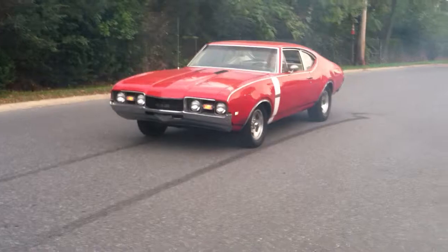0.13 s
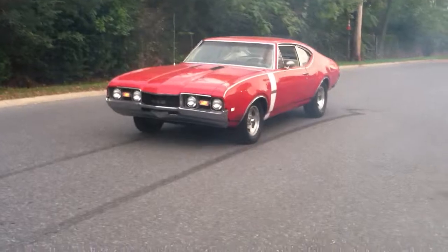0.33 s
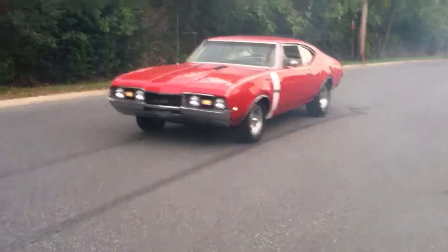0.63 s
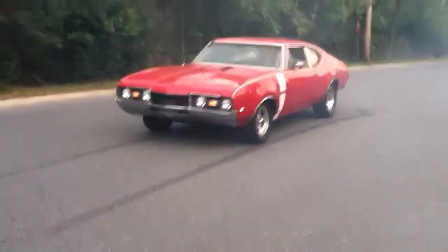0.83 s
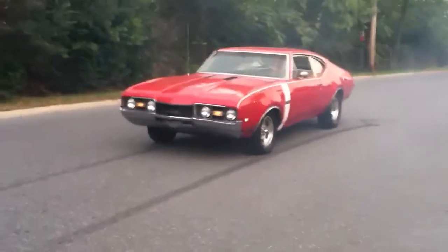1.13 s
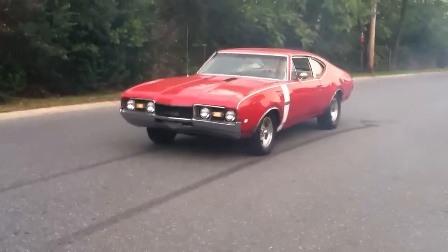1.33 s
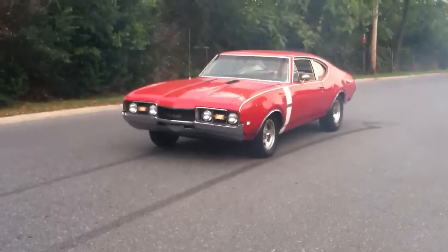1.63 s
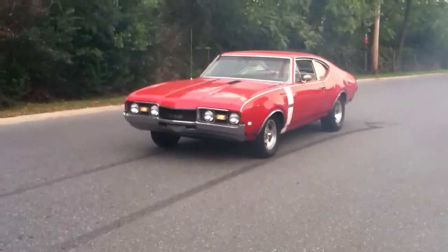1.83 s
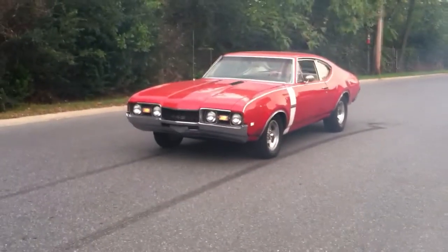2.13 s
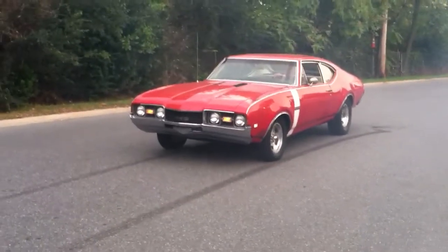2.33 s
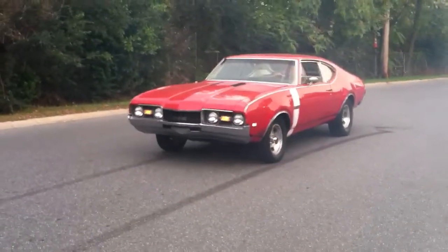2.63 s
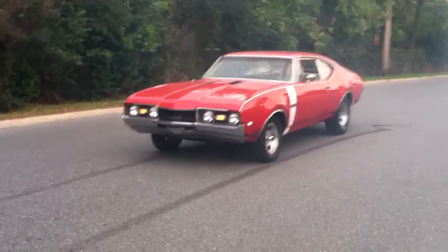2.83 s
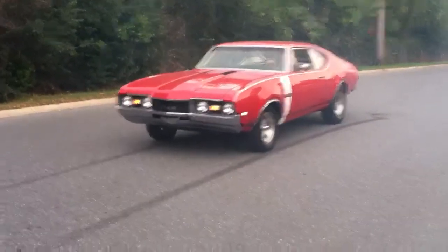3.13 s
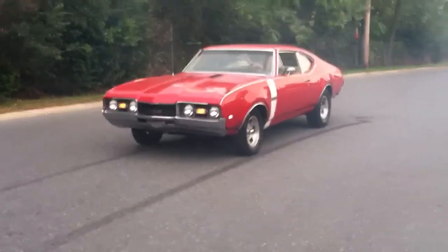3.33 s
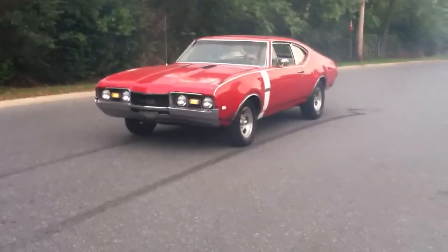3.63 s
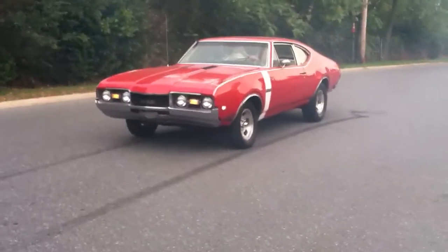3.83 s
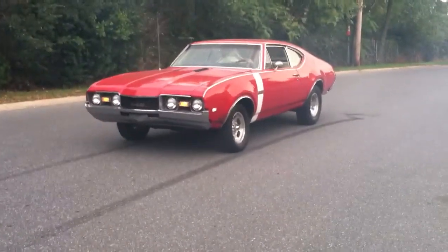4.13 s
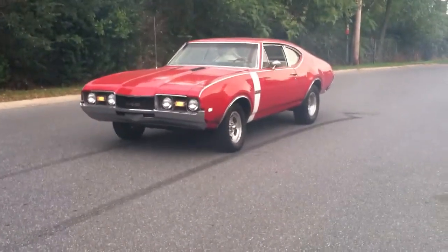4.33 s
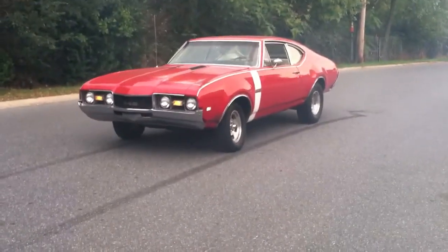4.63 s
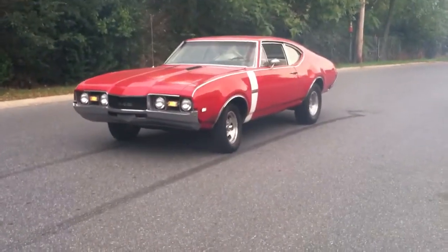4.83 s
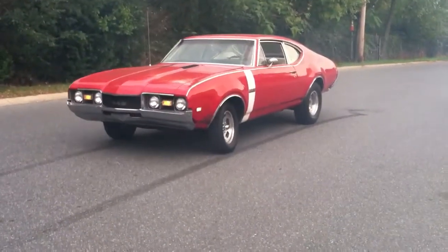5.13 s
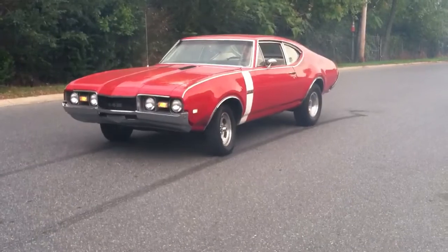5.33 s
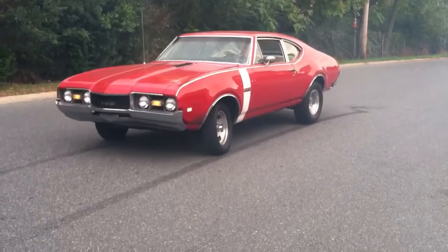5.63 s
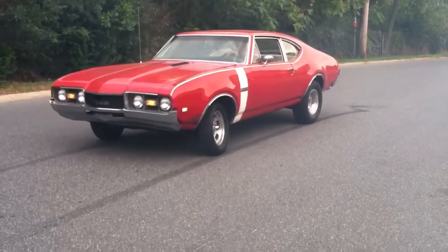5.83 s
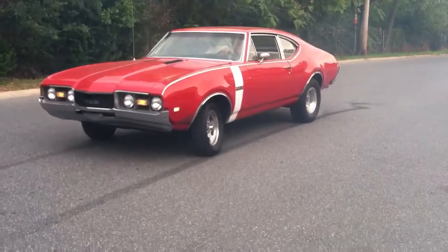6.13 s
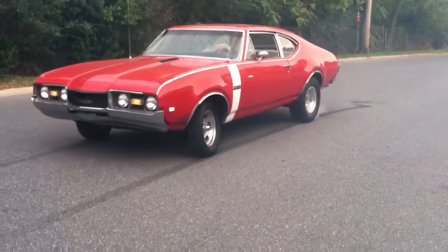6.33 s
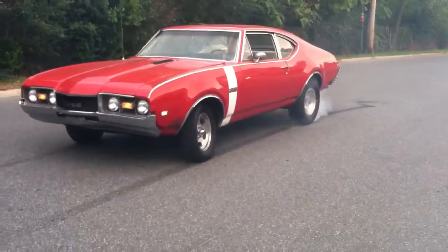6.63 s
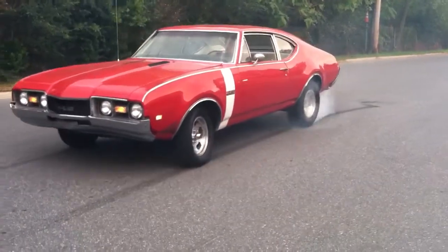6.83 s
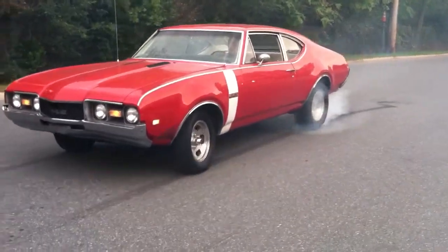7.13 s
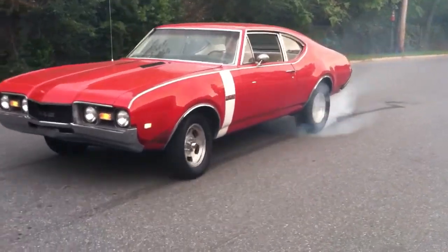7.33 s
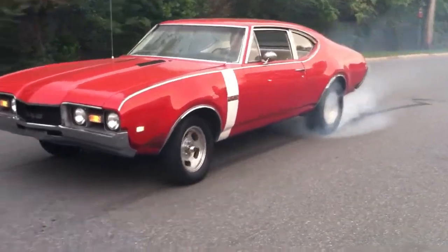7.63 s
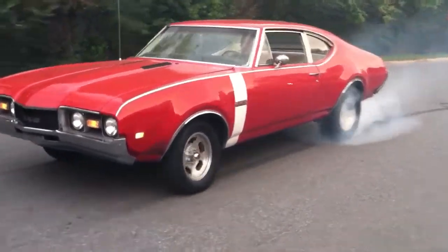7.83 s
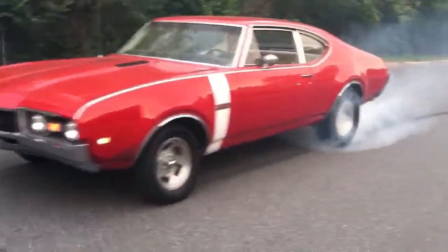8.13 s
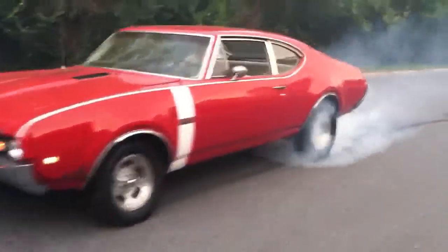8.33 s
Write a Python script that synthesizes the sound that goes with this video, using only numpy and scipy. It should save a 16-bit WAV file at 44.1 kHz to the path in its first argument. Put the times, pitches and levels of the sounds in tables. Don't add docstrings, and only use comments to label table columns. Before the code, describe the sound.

Outdoors, a phone a few metres from an old V8 car picks up uneven idling, breathy air puffs and a faint body knock. The engine loads up to a steady growl while a slipping belt chirps. Then rubber lets go with a burst of gritty hiss and a piercing, slightly wavering screech, lightly echoed by trees, over a raspy roar that rises and holds until the cut.

```python
import sys
import numpy as np
from scipy import signal
from scipy.io import wavfile
from scipy.ndimage import uniform_filter1d

SR = 44100
rng = np.random.default_rng(int(sys.argv[2]) if len(sys.argv) > 2 else 0)


def decibels_to_gain(level_db):
    exponent = np.asarray(level_db, float) / 20
    return 10 ** exponent


def persist_wave(psi):
    counts = np.round(np.clip(psi, -1, 1) * 32767).astype(np.int16)
    wavfile.write(sys.argv[1], SR, np.atleast_2d(counts).T)


N = 373527

# time_s, throttle_0to1, tyre_slip_0to1, intake_whistle_0to1
DRIVE = [(0, 0, 0.16, 0.3), (.25, 0, 0.36, 0.74), (.75, 0.01, 0.36, 0.57), (.9, 0, .3, 0.33),
         (1.8, 0.04, 0.21, 0.26), (2.2, 0.28, 0.36, 0.44), (2.7, 0.7, 0.42, .55), (3.05, 0.72, 0.42, 0.38),
         (3.25, 0.73, 0.57, 0.58), (3.7, 0.74, 0.82, 0.77), (3.87, 0.98, 0.86, 0.95), (3.96, 1, 0.8, 0.34),
         (4.36, 0.86, 0.71, 0.34), (6, 0.92, 0.69, 0.3), (8.2, 0.89, 0.76, 0.51), (8.34, 0.95, 0.8, 0.57),
         (8.47, 0.98, 0.7, .7)]
# time_s, cycles_per_s
SPEED = [(0, 5.95), (2.03, 5.95), (2.55, 11.5), (2.75, 13.7), (2.94, 14.5), (3.7, 14.4), (3.77, 15.1),
         (4.01, 20.3), (4.25, 24.3), (4.55, 26.6), (5.58, 29.8), (5.87, 33.0), (6.22, 41.1), (6.41, 44.4),
         (6.73, 45.4), (8.13, 46.7), (8.27, 40.3), (8.47, 41.1)]
ORDER_SPEEDS = [16, 22, 28.5, 33, 44]
# multiple, level_db at each speed
ORDERS_DB = [(2, 0, -4, 0, 0, -20), (3, -5, -5, -4, -9, -6), (4, 6, 3, -6, -21, -7.5),
             (5, 5, -3.5, 1, -2.5, -3), (6, 1, -8, -16.5, 2.5, 2.5), (7, -6, -4, -11.5, -1, -16),
             (8, 6, -8, -9.5, -0.5, -0.5), (9, 5, -6.5, 1.5, 3, -3.5), (10, -22, -14, -6, -10, -29),
             (11, 2.5, 2, -3, 3.5, -10.5), (12, -9, -6, -17, -9, 2), (13, -6, -7.5, -0.5, -11, -12),
             (14, -20, -11, -3.5, -18, -4.5), (15, -1, -7, -9, -3, -7.5), (16, -4, -1, -8.5, 2, 2),
             (17, -1.5, -4.5, 2, -5, -2.5)]
RASP_DB = [-1.5, 6, 4.5, 10, 10.5]
RASP_HZ = (245, 330, 766, 990)
MUFFLE_DB = [-7, -4, 4, -2, 1.5]
CYLINDERS_DB = [3, -2.5, 0, 7.5, -2.5, -1, 1, 2]
# pitch_hz, level_db
PIPE = [(70, -39.5), (115, -12), (165, -2.5), (205, -4.5), (250, 2.5), (310, -13.5), (400, -15.5),
        (480, -14.5), (620, -15), (800, -11.5), (1200, -22.5), (2500, -63), (6000, -94)]
# cycles_per_s, level_db
UNEVEN = [(8.5, 0), (14, -11), (30, -9), (44, -13), (46, -15)]
# pitch_ratio, width_hz, level_db
DRONE_PARTIALS = [(0.5, 44, -3.5), (1, 9.4, 0), (1.5, 22, -15), (3, 56, -11.5)]
# pitch_hz, level_db
AIR = [(240, -30), (400, -9), (604, -1), (652, -4.5), (1150, -8.5), (1450, -8), (2180, -5), (2510, -9),
       (2790, -8), (3150, -20), (4760, -0.5), (8650, -12), (10500, -17.5), (12700, -21.5), (15500, -35)]
# pitch_hz, level_db
SCRUB = [(240, -31), (400, -13.5), (546, -17), (597, -22), (723, -7.5), (827, -8.5), (1000, -2.5),
         (1220, -3), (1610, -14.5), (2130, -12), (2630, -24), (3480, -16), (4610, -29.5), (8590, -31.5),
         (13800, -63.5)]
# pitch_hz, width_hz, level_db
SCRUB_MODES = [(1611, 222, 12.5), (3330, 270, 7.5), (2980, 380, -4.5), (1186, 160, -11), (6640, 1500, 4.5),
               (8790, 650, 5.5), (2340, 430, 7)]
# delay_s, share, treble_edge_hz
ROAD_ECHO = (0.00139, 0.55, 4500)
# start_s, level_db
GASPS = [(0.021, -22), (0.1301, -24), (0.2418, -24), (0.3112, -28), (0.3506, -25), (0.411, -20),
         (0.47, -34), (0.5427, -24), (0.6684, -32), (0.8116, -34), (0.857, -45), (0.9467, -28),
         (1.0161, -24), (1.0565, -24), (1.2027, -30), (1.2845, -27.5), (1.3349, -25), (1.4012, -20),
         (1.4805, -37), (1.5219, -23.5), (1.6272, -22.5), (1.6706, -39), (1.729, -21.5), (1.8128, -23),
         (1.8502, -23), (1.943, -22.5), (1.9849, -39), (2.0353, -33), (2.0727, -30)]
# start_s, level_db, pitch_hz
KNOCKS = [
    (0.756, -27, 376),
    (0.762, -28, 330),
]
# start_s, length_s, level_db, pitch_ratio
CHIRPS = [
    (2.341, .052, -33, 1),
    (2.428, .07, -30, 1),
    (2.53, .066, -32, 1),
    (2.621, .062, -31, 1),
    (2.712, .042, -40, 1),
    (2.78, .06, -47, .88),
    (2.86, .06, -45, .9),
]
# time_s, pitch_hz, level_db
TONE = [(3.95, 970, -17), (4.7, 952, -18), (5.3, 948, -18), (5.75, 957, -17), (6.3, 1012, -17),
        (6.8, 1042, -17), (7.05, 1025, -17), (7.7, 1042, -17), (8.18, 1052, -16.5), (8.26, 1135, -22),
        (8.47, 1155, -22.5)]
# time_s, half_length_s, level_db, pitch_shift_hz
SNAGS = [
    (5.332, .03, 4.5, -25),
    (5.434, 0.034, 3, -10),
    (6.635, .02, -22, 2.5),
    (7.848, 0.041, 8, -34.5),
]
# cycles_per_s, octave_db, shadow_note_db, waver_share
OVERTONES = [(22, -9, -13, .008), (27.5, -11, -9, .013), (31, -16, -11, .009), (41, -20, -15, .008)]
# time_s, pitch_hz, level_db, roughness_share
STRAND = [(3.9, 1746, -43, 0.017), (4.2, 1722, -24, 0.021), (4.7, 1682, -21, .02), (5.3, 1641, -17, 0.024),
          (5.9, 1645, -21.5, .04), (6.8, 1581, -21, 0.055), (8.47, 1600, -23, 0.068)]
# rest_db, per_throttle_db, per_slip_db, per_whistle_db, once_loose_db
EXHAUST_LAW = (-49, 33.5, 0, -2, -1.5)
DRONE_LAW = (-50, 34, 2, 0.5, 0)
HISS_LAW = (-41.5, 10, 6, 6, 7.5)
BODY_LAW = (-55.5, 13, 8, 3.5, 14.5)
WHISTLE_LAW = (-9, -1, -6.5, 25.5, 5.5)
TREAD_LAW = (-2.5, 0.5, 5, 6.5, 1)
BRIGHT_LAW = (-10.5, -3.5, 21.5, 21.5, -9.5)
# pitch_hz, level_db
MASK = [(8500, -10), (10300, -2), (11000, -3.5), (12300, -1.5), (13700, -25), (14200, 4), (15800, 4)]


def evened(x):
    return x / np.sqrt(np.mean(x ** 2) + 1e-20)


def steady(x, size=11025):
    power = uniform_filter1d(uniform_filter1d(x ** 2, size), size)
    return x / np.sqrt(power + 1e-20)


def drift(hz, size=N):
    return evened(signal.lfilter(*signal.butter(2, hz, fs=SR), rng.standard_normal(size)))


def read(points, hz):
    f, value = np.transpose(points)
    return np.interp(np.log(hz + 1), np.log(f + 1), value)


def curves(rows, t):
    s, *columns = np.transpose(rows)
    return [np.interp(t, s, c) for c in columns]


def bump(hz, centre_hz, width_hz):
    return 1 / (1 + (2 * (hz - centre_hz) / width_hz) ** 2)


def resonate(x, hz, width_hz):
    turn = np.exp(2j * np.pi * np.cumsum(hz * np.ones(len(x))) / SR)
    r = np.exp(-np.pi * width_hz / SR)
    return 2 * (turn * signal.lfilter([1 - r], [1, -r], x / turn + 1e-18)).real


def causal(points, size=8192):
    log_gain = np.log(decibels_to_gain(read(points, abs(np.fft.fftfreq(size, 1 / SR)))))
    return np.fft.ifft(np.exp(log_gain - 1j * signal.hilbert(log_gain).imag)).real[:size // 2]


def law(terms, t):
    rest, *per = terms
    loose = np.clip((t - 3.824) / 0.23, 0, 1)
    state = curves(DRIVE, t) + [loose]
    return rest + sum(p * s for p, s in zip(per, state))


def engine_speed(t):
    return curves(SPEED, t)[0]


def lope(t):
    speed = engine_speed(t)
    idling = np.clip((13 - speed) / 4, 0, 1)
    swing = np.cos(2 * np.pi * (np.cumsum(speed) / SR - .667))
    return decibels_to_gain(3.3 * idling * (swing + 0.26 * drift(12)))


def even_firing(t, speed, cycle):
    slow, coarse = t[::256], t[::8]
    slow_speed, coarse_cycle = speed[::256], cycle[::8]
    rasp_db = np.interp(slow_speed, ORDER_SPEEDS, RASP_DB)
    muffle_db = np.interp(slow_speed, ORDER_SPEEDS, MUFFLE_DB)
    even = np.zeros(len(coarse))
    for k in range(2, 61):
        hz = k * slow_speed
        row = k - 2 if k < 10 else 8 + (k - 10) % 8
        db = np.interp(slow_speed, ORDER_SPEEDS, ORDERS_DB[row][1:]) + read(PIPE, hz)
        db += rasp_db * np.interp(hz, RASP_HZ, [0, 1, 1, 0])
        db += muffle_db * np.clip(hz / 250 - 2, 0, 1)
        db += 1.46 * np.sin(2 * np.pi * (rng.uniform(1, 4.7) * slow + rng.random()))
        bank = np.sum(decibels_to_gain(CYLINDERS_DB) * np.exp(-2j * np.pi * k * np.arange(8) / 8))
        phase = np.angle(bank) - .19 * min(k, 19) ** 2
        phase += 2.2 * np.sin(.57 * k) * (k > 19)
        even -= np.interp(coarse, slow, decibels_to_gain(db)) * np.cos(2 * np.pi * k * coarse_cycle + phase)
    return signal.resample_poly(even, up=8, down=1)[:N]


def uneven_firing(speed, cycle):
    fired = np.flatnonzero(np.diff(np.floor(8 * cycle)) > 0)
    luck = rng.standard_normal((3000, 2))[:len(fired)]
    shift = (0.137 * luck[:, 0] * SR / 8 / speed[fired]).astype(int)
    late = np.clip(fired + shift, 0, N - 1)
    strength = 0.52 + 0.71 * np.tanh(luck[:, 1])
    blows = np.zeros(N)
    blows[late] = -decibels_to_gain(CYLINDERS_DB)[np.arange(len(fired)) % 8] * strength
    blows += 0.042 * rng.standard_normal(N)
    return signal.oaconvolve(blows, causal(PIPE))[:N]


def exhaust(t):
    speed = engine_speed(t)
    cycle = np.cumsum(speed * (1 + .002 * drift(6))) / SR
    even = steady(even_firing(t, speed, cycle))
    uneven = steady(uneven_firing(speed, cycle))
    change = uniform_filter1d(abs(np.gradient(np.log(speed))) * SR, size=4000)
    share = decibels_to_gain(np.minimum(curves(UNEVEN, speed)[0] + change, 0))
    mix = share * uneven + np.sqrt(np.clip(1 - share ** 2, 0, 1)) * even
    return decibels_to_gain(law(EXHAUST_LAW, t)) * np.sqrt(lope(t)) * mix


def drone(t):
    hz = 211.5 + 29.5 * curves(DRIVE, t)[0] + 4 * drift(1.45)
    air = rng.standard_normal(N)
    note = np.zeros(N)
    for ratio, width_hz, db in DRONE_PARTIALS:
        once = resonate(air, ratio * hz, width_hz)
        note += decibels_to_gain(db) * evened(resonate(once, ratio * hz, 2 * width_hz))
    fade = np.clip((2.95 - t) / 0.64, 0, 1)
    return decibels_to_gain(law(DRONE_LAW, t)) * lope(t) * note * fade


def rush_colour(hz, at, slip):
    scrub_db = read(SCRUB, hz) + sum(g * bump(hz, f, w) for f, w, g in SCRUB_MODES)
    delay, share, edge_hz = ROAD_ECHO
    comb = abs(1 + share / (1 + (hz / edge_hz) ** 2) * np.exp(-2j * np.pi * hz * delay))
    db = np.outer(read(AIR, hz) + 20 * np.log10(comb), 1 - slip) + np.outer(scrub_db, slip)
    db += np.outer(bump(hz, 5000, 1200), law(WHISTLE_LAW, at))
    db += np.outer(bump(hz, 4010, 580), law(TREAD_LAW, at))
    db += np.outer(np.log2(np.maximum(hz, 8000) / 8000), law(BRIGHT_LAW, at))
    spray_db = 20.5 * np.clip(1 - abs(at - 3.84) / 0.39, 0, 1)
    return db + np.outer(bump(hz, 8500, 8000), spray_db)


def carburettor_gulps(t):
    gulps, idle = np.zeros(N), round(2.5 * SR)
    for s, peak_db in GASPS:
        u = np.maximum(t[:idle] - s, 0)
        gulps[:idle] += decibels_to_gain(2 * (peak_db + 28)) * (1 - np.exp(-u / 0.001)) * np.exp(-u / 0.049)
    return np.where(t < 2.2, steady(np.sqrt(0.061 + gulps), size=9000), 1)


def rush(t):
    frames, hz = N // 128 + 5, np.fft.rfftfreq(512, 1 / SR)
    a, b, patches = rng.standard_normal((frames, 257, 3)).T
    patches = evened(uniform_filter1d(uniform_filter1d(patches, 3, 0), 14, 1))
    at = np.arange(frames) * 128 / SR
    slip = np.clip(curves(DRIVE, at)[1], 0, 1)
    db = rush_colour(hz, at, slip)
    z = (a + 1j * b) * decibels_to_gain((2.0 - 1.54 * slip) * patches + db)

    def part(weight, low_hz, high_hz):
        band = (hz > low_hz) & (hz < high_hz)
        level = np.sqrt(np.mean(decibels_to_gain(db)[band] ** 2, 0))
        return signal.istft(z * weight / level, nperseg=512, noverlap=384)[1][:N]

    high = np.clip((hz - 2300) / 700, 0, 1)[:, None]
    body, hiss = part(1 - high, 1250, 1800), part(high, 2600, 10000)
    gulps = carburettor_gulps(t)
    depth_db = .8 * np.clip(np.minimum(t - 2.3, 4.2 - t) / .3, 0, 1)
    beat_db = depth_db * np.cos(2 * np.pi * np.cumsum(engine_speed(t)) / SR) + 0.75 * drift(30)
    hiss = hiss * gulps * decibels_to_gain(law(HISS_LAW, t) + beat_db - 24.0)
    body = body * gulps ** 0.44 * decibels_to_gain(law(BODY_LAW, t) + .5 * beat_db - 9.0)
    return hiss + body


def body_knock(t):
    out = np.zeros(N)
    for s, db, hz in KNOCKS:
        u = np.maximum(t - s, 0)
        out += decibels_to_gain(db) * np.sin(2 * np.pi * hz * u) * np.exp(-u / 0.0027)
    return out


def belt(t):
    out = np.zeros(N)
    wobble = 1 + .023 * drift(150)
    grip = np.clip(1 + .5 * drift(60), 0, 3)
    for s, length, db, ratio in CHIRPS:
        arch = np.clip(1 - abs(2 * (t - s) / length - 1), 0, 1)
        hz = 2445 * ratio * (1 - .012 * arch)
        turns = np.cumsum(hz * wobble) / SR
        on = np.clip(arch * length / 0.014, 0, 1) * decibels_to_gain(db + 2 - 5 * (1 - arch))
        out += on * grip * (np.cos(2 * np.pi * turns) + decibels_to_gain(-7.5) * np.cos(4 * np.pi * turns))
    return out


def sing(hz, slow, fast, grip, second_db):
    turns = np.cumsum(hz * (1 + slow * drift(15) + fast * drift(110))) / SR
    hold = evened(np.clip(1 + grip * drift(50), 0, 4))
    return hold * np.sqrt(2) * (np.cos(2 * np.pi * turns) + decibels_to_gain(second_db) * np.cos(4 * np.pi * turns))


def squeal(t):
    bite_s = 3.905
    hz, db = curves(TONE, t)
    octave_db, under_db, waver = curves(OVERTONES, engine_speed(t))
    hz = hz + 70 * np.exp(-np.maximum(t - bite_s, 0) / .02)
    for s, half, snag_db, snag_hz in SNAGS:
        shape = np.clip(1 - abs(t - s) / half, 0, 1)
        hz, db = hz + snag_hz * shape, db + snag_db * shape
    clear = sing(hz, waver, .024, .41, octave_db)
    shadow = sing(hz * .94, 0.0145, 0.0221, 0.76, -47)
    near = decibels_to_gain(db + 1.5) * (clear + decibels_to_gain(under_db) * shadow)
    hz, db, rough = curves(STRAND, t)
    other = decibels_to_gain(db - 4.5) * sing(hz, rough, rough, 0.7, -10)
    return (near + other) * np.clip((t - bite_s) / .03, 0, 1)


def tree_echo(sound):
    lag = np.arange(9000) / SR
    trees = rng.standard_normal(9000) * np.exp(-lag / 0.058) * (lag > .012)
    return signal.oaconvolve(sound, trees / np.linalg.norm(trees))[:N]


def scene():
    t = np.arange(N) / SR
    tyres = squeal(t)
    car = exhaust(t) + drone(t) + rush(t) + body_knock(t) + belt(t)
    return (car + 0.72 * tyres + decibels_to_gain(-6.5) * tree_echo(tyres))[None]


def thin(x):
    hz, _, z = signal.stft(x, SR, nperseg=1024, noverlap=768)
    power = abs(z) ** 2
    local = uniform_filter1d(uniform_filter1d(power, size=4, axis=1), size=4, axis=2)
    mean = uniform_filter1d(uniform_filter1d(power, size=16, axis=1), size=60, axis=2)
    loud_db = 10 * np.log10(mean.sum(1, keepdims=True) + 1e-20)
    limit_db = read(MASK, hz)[:, None] + 0.057 * (loud_db - 1)
    local_db = 10 * np.log10(abs(local / (mean + 1e-20)) + 1e-9)
    keep = np.clip(local_db - limit_db, 0, 1)
    z = z * np.where(hz[:, None] > 8500, keep, 1)
    return signal.istft(z, SR, nperseg=1024, noverlap=768)[1][:, :N]


def low_pass(x):
    return signal.sosfilt(signal.butter(12, 15610, fs=SR, output="sos"), x)


def record(dry):
    bass_cut = signal.butter(3, 95, "high", fs=SR, output="sos")
    x = signal.sosfilt(bass_cut, 1.059 * np.tanh(dry / 0.86))
    breeze = decibels_to_gain(-77) * drift(55) * decibels_to_gain(4.5 * drift(7))
    x = x + breeze * (1 + 13 * np.sqrt(uniform_filter1d(x ** 2, 8000)))
    x = x - 0.63 * resonate(x[0], 11270, 1200)
    limited = x / (1 + (abs(x) / .74) ** 8) ** (1 / 8)
    start = np.clip((np.arange(N) / SR - 0.0205) / .001, 0, 1)
    return low_pass(thin(limited) * start)


dry = scene()
out = record(dry)
persist_wave(out)
```